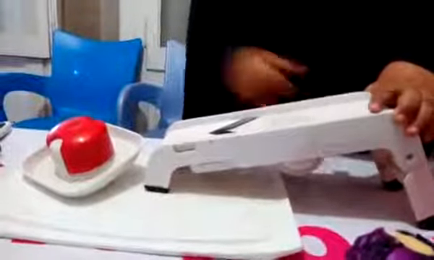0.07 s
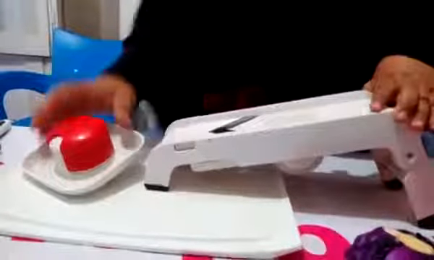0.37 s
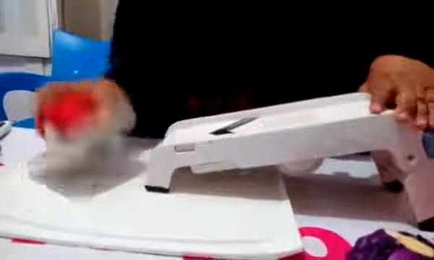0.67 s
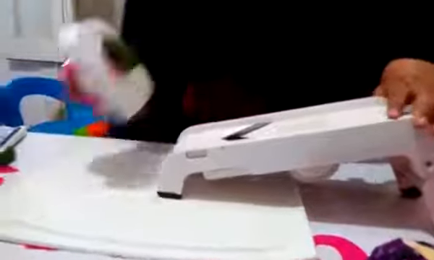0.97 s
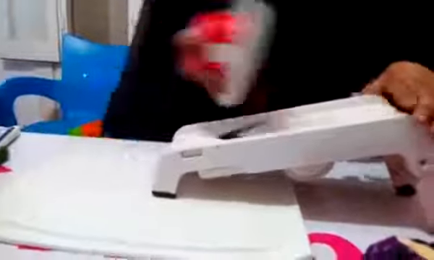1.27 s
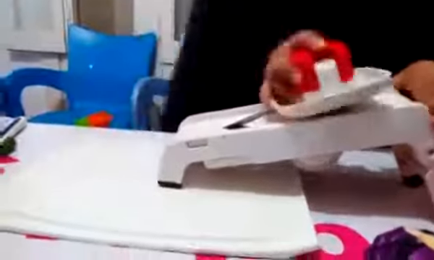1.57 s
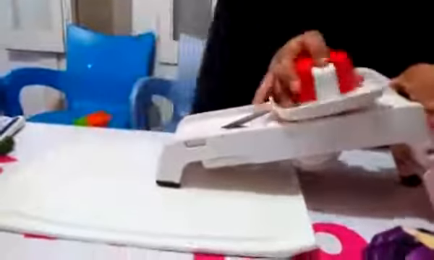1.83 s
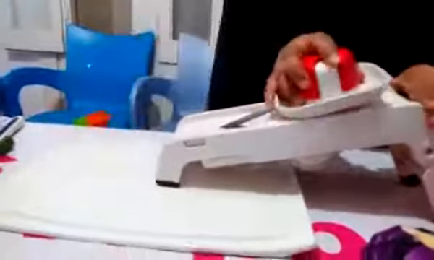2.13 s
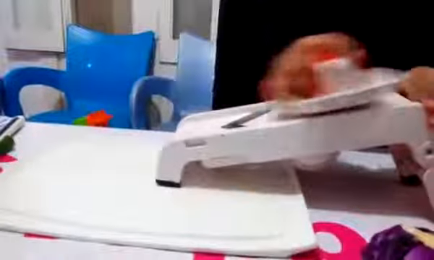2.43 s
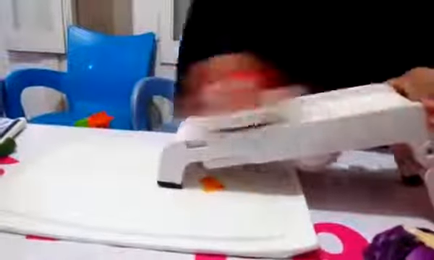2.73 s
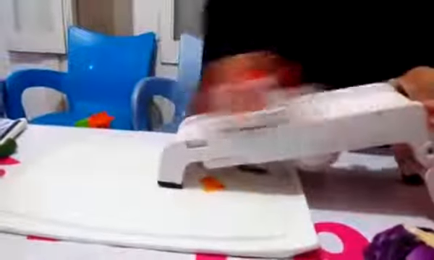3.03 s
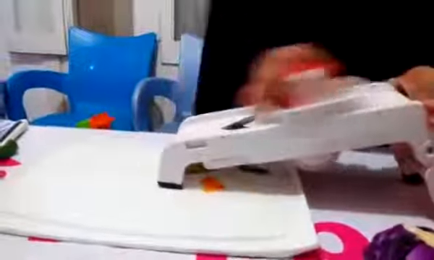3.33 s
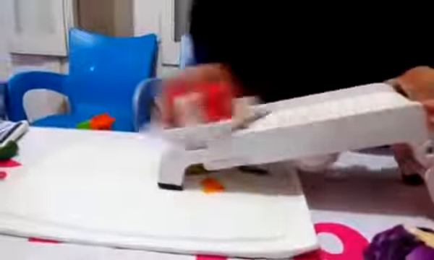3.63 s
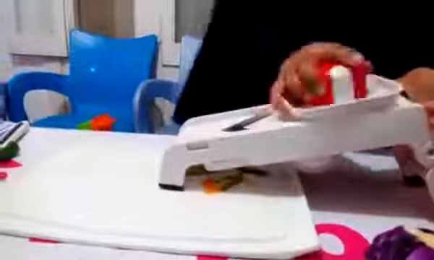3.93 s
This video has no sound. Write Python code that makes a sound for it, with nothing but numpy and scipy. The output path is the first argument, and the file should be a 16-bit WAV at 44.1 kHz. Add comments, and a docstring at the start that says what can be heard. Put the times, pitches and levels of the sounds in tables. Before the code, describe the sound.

Plastic rasps on a slicer in a small room with low background noise. Soft touches come first, then the holder knocks on the rails and slides rapidly back and forth, thumping the table, a little left of the microphones.

```python
"""Plastic slicer on a table

A plastic food holder is lifted, set on a plastic slicer and pushed to and fro over the blade, ever
faster. Each stroke rasps and rings the hollow holder and the frame; the holder knocks on the rails
and the feet thump the table. A pair of small microphones hears the slicer a little to the left,
in a small hard room with a low steady background."""
import sys
import numpy as np
from scipy import signal
from scipy.fft import rfft, irfft, next_fast_len
from scipy.io import wavfile
from scipy.ndimage import map_coordinates

SR = 44100
rng = np.random.default_rng(int(sys.argv[2]) if len(sys.argv) > 2 else 0)


def persist_wave(psi):
    """Save psi, clipped to +-1, as 16-bit WAV."""
    counts = np.round(np.clip(psi, -1, 1) * 32767).astype(np.int16)
    wavfile.write(sys.argv[1], SR, np.atleast_2d(counts).T)


N = 176400

# The holder's slides along the slicer. Each row: fastest moment, rise and fall in seconds, levels of
# rasp, holder, frame and table in dB, lift of the rasp's sizzle in dB.
SLIDES = [(.03, 0.16, 0.23, -74.5, -71.5, -65.5, -55.5, -20), (.8, 0.23, 0.23, -69, -73, -79, -73, 1),
          (1.839, 0.025, 0.027, -48.5, -54, -43.5, -81, -4), (1.995, 0.078, 0.051, -60, -70.5, -84, -72, 4),
          (2.62, 0.072, 0.3, -72, -89, -77, -83.5, 9), (2.717, 0.00994, .06, -46, -49.5, -46, -55.5, 9.5),
          (2.871, 0.16, 0.24, -72, -88.5, -67.5, -56, 7.5),
          (3.237, 0.028, 0.032, -36.5, -44.5, -40, -45, 1.5),
          (3.367, 0.0232, 0.0272, -50.5, -36, -53, -43, 0),
          (3.479, .11, 0.12, -36.5, -40.5, -42.5, -49, 0.5),
          (3.691, 0.07, 0.12, -36.5, -39.5, -59, -77, -1), (3.75, 0.028, 0.077, -33, -37.5, -47, -47, 4),
          (3.983, 0.11, 0.082, -37, -38, -45.5, -52.5, 0)]
# Plastic rubbing on plastic, right at the rails. Each row: frequency in Hz, level in dB.
RASP_SPECTRUM = [(200, -40), (900, -10.5), (2000, -1.5), (4000, 0.5), (5500, -3.5), (7300, 0), (8500, -2),
                 (11500, -6.5), (15000, -15)]
# Resonances of the slicer's parts and the table under it. Each row: centre and width in Hz, level in dB.
HOLLOW_MODES = [(2000, 510, -3.5), (2330, 410, 8.5), (2627, 500, 4)]
BLADE_MODES = [(5574, 310, -4.5), (6850, 120, 5), (7356, 86, -2), (7700, 260, 2.5)]
FRAME_MODES = [(734, 109, 1.5), (1018, 116, -2.5), (1324, 69, -2.5), (1903, 96, -11), (2680, 330, -12.5)]
TABLE_MODES = [(49, 18, -13.5), (115, 11.3, -2), (160, 24.3, 2), (198, 37, -4), (230, 53, -8),
               (317, 26.3, 2.5), (377, 97, -9)]
STROKE_SHAPE, JUDDER_DB, BLADE_RUB_DB = 1.97, 1.1, -17
SIZZLE_HZ, SINK_OCTAVES_PER_S = 9450, 1.6
def strokes():
    """Each slide swells and fades; its friction rasps and rings blade, frame, table and hollow holder."""
    t = np.arange(N) / SR
    drive, weighted_time = np.zeros((5, N)), np.zeros(N)
    for peak_s, rise_s, fall_s, *levels_db, sizzle_lift_db in SLIDES:
        from_peak = np.abs(t - peak_s) / np.where(t < peak_s, rise_s, fall_s)
        swell = amp(-20 * np.minimum(from_peak, 10) ** STROKE_SHAPE)
        peak_gains = amp(levels_db + [levels_db[0] + sizzle_lift_db])
        power = (peak_gains[:, None] * swell) ** 2
        drive += power
        weighted_time += power[1] * np.clip(t - peak_s, -.06, .08)
    rasp, holder, frame, table, sizzle = np.sqrt(drive) * amp(JUDDER_DB * wobble(70))
    rub, body_rub = friction(), friction()
    hiss = coloured(rub, RASP_SPECTRUM) + amp(BLADE_RUB_DB) * ring(rub, BLADE_MODES)
    top = filtered(hiss, lambda hz: 1 / (1 + (SIZZLE_HZ / (hz + 1)) ** 10))
    # The hollow of the holder sinks in pitch through each slide.
    since_peak_s = weighted_time / (drive[1] + 1e-30)
    clock = np.cumsum(2 ** (-SINK_OCTAVES_PER_S * since_peak_s)) % (N - 1)
    hollow = np.array([np.interp(clock, np.arange(N), side) for side in ring(rub, HOLLOW_MODES)])
    body = ring(frame * body_rub, FRAME_MODES) + ring(table * body_rub, TABLE_MODES)
    return rasp * (hiss - top) + sizzle * top + holder * hollow + body


# Sound straight from slicer to microphones. Each row: frequency in Hz, left-right likeness from 0 to 1.
DIRECT_LIKENESS = [(400, 0.99), (1200, 0.37), (2400, 0.4), (5000, 0.1), (12000, 0.1)]
SLIPS_PER_S, SLIP_SPREAD_DB, SMOOTH_SHARE = 2500, 2, 0.59
CATCHES_PER_S, CATCH_SHARE = 260, 0.09
def friction():
    """Dense tiny slips of uneven size and sparser catches over a smooth rub."""
    slips = (rng.random((2, N)) < SLIPS_PER_S / SR) * rng.standard_normal((2, N))
    slips *= amp(SLIP_SPREAD_DB * rng.standard_normal((2, N)))
    catches = (rng.random(N) < CATCHES_PER_S / SR) * rng.uniform(-0.8, 1, N)
    smooth = np.sqrt(SMOOTH_SHARE) * rng.standard_normal((2, N))
    rub = spread(np.sqrt(1 - SMOOTH_SHARE) * unit(slips) + smooth, DIRECT_LIKENESS)
    return np.sqrt(1 - CATCH_SHARE) * rub + np.sqrt(CATCH_SHARE) * unit(catches)


# The holder hits the rails. Each row: start in seconds, clack pitch in Hz, levels of clack, shell,
# frame and crack in dB.
RAIL_KNOCKS = [(0.941, 2760, -70, -74, -76.5, -59.5), (1.47, 2180, -66, -66, -65, -68),
               (1.746, 2160, -71, -70, -59.5, -71), (1.836, 2680, -71, -62, -42, -58),
               (2.0605, 2000, -65.5, -70, -58, -66), (2.2022, 1938, -29.5, -29.5, -40, -58),
               (2.928, 2490, -43.5, -43, -41.5, -44), (2.9326, 2033, -30.5, -41, -23, -30),
               (2.939, 2400, -37, -39, -41, -36), (2.966, 2130, -57, -41, -37, -43.5),
               (3.2047, 2640, -31.5, -27.5, -44.5, -32.5), (3.2627, 2366, -30, -34.5, -37, -51),
               (3.295, 1953, -39, -56, -34.5, -49), (3.42, 2360, -38, -51, -43, -40),
               (3.4502, 1890, -36.5, -28, -32.5, -33.5), (3.7213, 2460, -24.5, -30, -30, -26.5)]
# Resonances of the holder's struck shell. Each row: centre and width in Hz, level in dB.
SHELL_MODES = [(1335, 162, -0.5), (1860, 340, -2), (2400, 354, -2), (2920, 590, -4.5), (4067, 1180, -15)]
# The crack at the point of contact. Each row: frequency in Hz, level in dB.
CRACK_SPECTRUM = [(200, -9), (900, -16.5), (3000, 10), (5500, 1), (7600, 1), (9000, -1), (12000, -13.5),
                  (15000, -22)]
CLACK_ATTACK_S, CLACK_T60_S = 0.00048, 0.017
CRACK_ATTACK_S, CRACK_T60_S = 0.0002, 0.044
CHATTER_GAIN, CHATTER_ATTACK_S, CHATTER_T60_S = 0.18, 0.0011, 0.037
def knocks():
    """A chattering contact cracks and shakes frame and shell; the holder's near wall clacks at a pitch."""
    t = np.arange(SR // 10) / SR
    clack, shell, frame, crack = np.zeros((4, 2, N))
    envelope = lambda attack_s, t60: (1 - np.exp(-t / attack_s)) * fade(t, t60)
    burst = lambda attack_s, t60: rng.standard_normal((2, len(t))) * envelope(attack_s, t60)
    contact = lambda: (t == 0) + CHATTER_GAIN * burst(CHATTER_ATTACK_S, CHATTER_T60_S)
    for start, hz, clack_db, shell_db, frame_db, crack_db in RAIL_KNOCKS:
        add(clack, start, np.sin(2 * np.pi * hz * t) * envelope(CLACK_ATTACK_S, CLACK_T60_S), clack_db)
        add(shell, start, contact(), shell_db)
        add(frame, start, contact(), frame_db)
        add(crack, start, burst(CRACK_ATTACK_S, CRACK_T60_S), crack_db)
    crack = coloured(spread(crack, DIRECT_LIKENESS), CRACK_SPECTRUM)
    return clack, ring(shell, SHELL_MODES), ring(frame, FRAME_MODES) + crack


# The slicer's feet on the tabletop. Each row: start in seconds, level in dB, low-pass cutoff in Hz.
FOOT_THUMPS = [(2.213, -34.5, 166), (2.237, -49, 129.4), (2.933, -26, 695), (2.947, -24, 529),
               (2.99, -34, 160.2), (3.27, -27, 452.4), (3.303, -30, 700), (3.365, -38.5, 220),
               (3.746, -32.5, 1100), (3.836, -43, 199.5), (3.99, -36, 249.4)]
def thumps():
    """The feet push and shudder on the table, which booms briefly; softer pushes tend to be duller."""
    t, pushes = np.arange(SR // 10) / SR, np.zeros(N)
    for start, db, cutoff_hz in FOOT_THUMPS:
        push = np.zeros(N)
        shudder = 0.023 * rng.standard_normal(len(t)) * fade(t, t60=0.095)
        add(push, start, (t == 0) + shudder, db)
        pushes += signal.lfilter(*signal.butter(2, cutoff_hz, fs=SR), push)
    return ring(pushes, TABLE_MODES) * np.ones((2, 1))


# Light touches on the blade. Each row: start in seconds, pitch in Hz, level in dB.
BLADE_TOUCHES = [(1.837, 5725, -49), (2.503, 7540, -56), (2.571, 7400, -69), (2.72, 6850, -52.5)]
def blade_ticks():
    """The steel blade is touched: a thin tick with a short ring."""
    t, ticks = np.arange(SR // 10) / SR, np.zeros((2, N))
    for start, hz, db in BLADE_TOUCHES:
        tick = np.diff(rng.standard_normal((2, len(t) + 1))) * fade(t, t60=0.013)
        ping = np.sin(2 * np.pi * hz * t) * fade(t, t60=0.02)
        add(ticks, start, ping + 0.57 * tick, db)
    return ticks


GROAN_PEAK_S, GROAN_HALF_WIDTH_S, GROAN_HZ, GROAN_DB = 2.905, .035, 508, -52.5
def groan():
    """Plastic sticks and slips at a nearly steady rate just before the hardest knock."""
    t = np.arange(N) / SR
    swell = np.exp(-((t - GROAN_PEAK_S) / GROAN_HALF_WIDTH_S) ** 2)
    return amp(GROAN_DB) * swell * np.sin(2 * np.pi * GROAN_HZ * t + .5 * wobble(97))


# The small hard room around the table. Each row: frequency in Hz, seconds to die away by 60 dB.
ROOM_DECAY = [(100, 0.49), (300, 0.32), (800, 0.41), (2200, 0.49), (6000, 0.42), (13000, 0.2)]
# Room sound at the two microphones. Each row: frequency in Hz, left-right likeness from 0 to 1.
ROOM_LIKENESS = [(100, 0.94), (400, 0.83), (700, 0.49), (1100, 0.17), (2000, 0.1), (6000, 0.068),
                 (14000, .05)]
WALL_DELAY_S = .005
def room(x):
    """Nearby walls return a diffuse tail; each frequency dies at its own speed."""
    hz, t, noise = signal.stft(rng.standard_normal((2, SR)), SR, nperseg=256)
    tail = signal.istft(noise * fade(t, along(ROOM_DECAY, hz)[:, None]), SR, nperseg=256)[1]
    tail = spread(tail / np.linalg.norm(tail[0]), ROOM_LIKENESS)[:, :SR]
    wet = signal.fftconvolve(x, tail, axes=1)[:, :N]
    return filtered(wet, lambda f: np.exp(-2j * np.pi * f * WALL_DELAY_S))


# Room tone all around the microphones. Each row: frequency in Hz, level in dB.
ROOM_TONE_SPECTRUM = [(20, -15), (50, -6.5), (160, 0), (330, -2), (480, -9.5), (750, -4), (1300, -15),
                      (2500, -16.5), (5000, -25.5), (8000, -33.5), (12000, -32.5), (15000, -33)]
# Its slow drift. Each row: time in seconds, level in dB.
ROOM_TONE_LEVEL = [(0, -55.5), (.5, -57), (1.1, -55.5), (1.6, -57.5), (2.5, -58.5), (4, -58)]
def room_tone():
    """Low noise of the room, a little louder on the left, wavering slightly and slowly sinking."""
    air = coloured(spread(rng.standard_normal((2, N)), ROOM_LIKENESS), ROOM_TONE_SPECTRUM)
    level_db = np.interp(np.arange(N) / SR, *np.transpose(ROOM_TONE_LEVEL))
    return air * amp(level_db + 0.75 * wobble(6.22)) * amp([[1.3], [-1.3]])


def amp(db):
    """Decibels to gain."""
    return 10 ** (np.asarray(db) / 20)


def unit(x):
    """Scale to rms 1."""
    return x / np.sqrt(np.mean(x ** 2) + 1e-20)


def along(points, hz):
    """Interpolate (Hz, value) points on a log frequency axis."""
    point_hz, values = np.transpose(points)
    return np.interp(np.log(hz + 1), np.log(point_hz + 1), values)


def fade(t, t60):
    """Exponential decay, 60 dB down after t60 seconds."""
    return np.exp(-np.log(1000) * t / t60)


def wobble(knots_per_s):
    """A smooth random curve."""
    knots = rng.standard_normal(int(N * knots_per_s / SR) + 4)
    return map_coordinates(knots, [np.arange(N) * knots_per_s / SR])


def filtered(x, response, keep_power=False):
    """Apply a frequency response, optionally scaled to unit power gain."""
    size = next_fast_len(N + SR // 2)
    gain = response(np.fft.rfftfreq(size, 1 / SR))
    if keep_power:
        gain = gain / np.sqrt(np.mean(np.abs(gain) ** 2))
    return irfft(rfft(x, size) * gain, size)[..., :N]


def coloured(x, spectrum):
    """Shape x by a spectrum of (Hz, dB) points."""
    return filtered(x, lambda hz: amp(along(spectrum, hz)), keep_power=True)


def ring(x, modes):
    """Pass x through a body's resonances, which alternate in sign."""
    def response(hz):
        return sum((-1) ** k * amp(db) * 1j * hz * width / (centre ** 2 - hz ** 2 + 1j * hz * width)
                   for k, (centre, width, db) in enumerate(modes))
    return filtered(x, response, keep_power=True)


def spread(pair, likeness):
    """Two unrelated signals become left and right of a given likeness."""
    turn = lambda hz: np.arccos(np.clip(along(likeness, hz), -1, 1)) / 2
    mid, side = filtered(pair, lambda hz: np.array([np.cos(turn(hz)), np.sin(turn(hz))]))
    return np.array([mid + side, mid - side])


def add(track, start_s, burst, db):
    """Place a burst whose energy equals 10 ms at the given level."""
    energy = np.sum(burst ** 2) / len(np.atleast_2d(burst))
    part = track[..., round(start_s * SR):][..., :burst.shape[-1]]
    part += (amp(db) * burst * np.sqrt(SR / 100 / energy))[..., :part.shape[-1]]


# The slicer as heard from the microphones. Each row: frequency in Hz, left over right in dB.
SLICER_BALANCE = [(100, 3), (700, 2.5), (1300, 0.5), (2100, 12.5), (2600, 6), (3200, 1.5), (4200, 3),
                  (5400, 0.5), (7000, 4.5), (8400, 10.5), (10500, 0), (13000, 4), (14800, 5)]
def scene():
    """The slicer stands to the left; the holder's shell radiates most widely into the room."""
    slides, booms, ticks = strokes() + groan(), thumps(), blade_ticks()
    clack, shell, frame_hits = knocks()
    direct = slides + booms + ticks + clack + amp(-4.5) * shell + frame_hits
    wet = amp(-6.5) * room(slides + frame_hits)
    wet += room(amp(-7.5) * shell + amp(-18) * clack + amp(-6.5) * booms + amp(-7) * ticks)
    slicer = filtered(direct + wet, lambda hz: amp(along(SLICER_BALANCE, hz) * np.array([[.5], [-.5]])))
    return slicer + room_tone()


# The colour of both microphones. Each row: frequency in Hz, gain in dB.
MIC_RESPONSE = [(2800, -1.5), (3600, -7.5), (4200, -1.5), (4850, -6.5), (5400, 5.5), (6400, -1), (7000, 7),
                (8500, -5), (9700, -14.5), (10500, 1), (13000, 4.5), (13650, -3), (14700, 1)]
BAND_LIMIT_HZ = 15150
def record(dry):
    """Small microphones with peaks and dips in the treble, and a band limit."""
    return filtered(dry, lambda hz: amp(along(MIC_RESPONSE, hz)) * (hz < BAND_LIMIT_HZ))


dry = scene()
out = record(dry)
persist_wave(out)
```